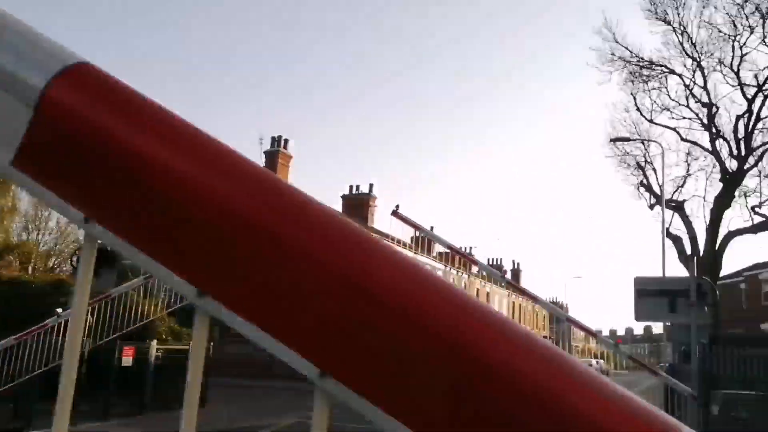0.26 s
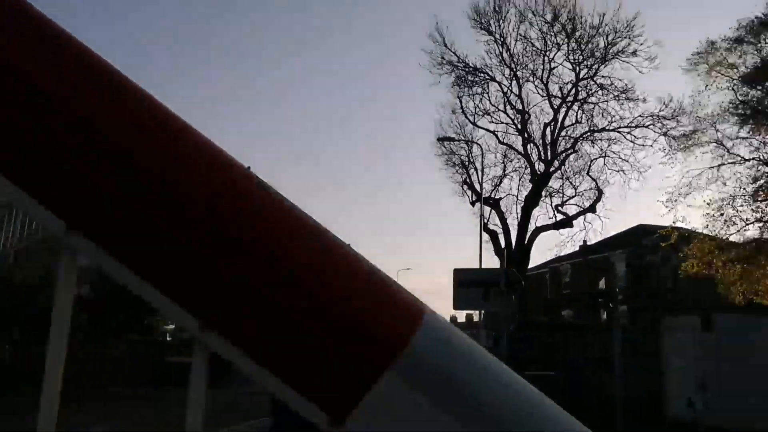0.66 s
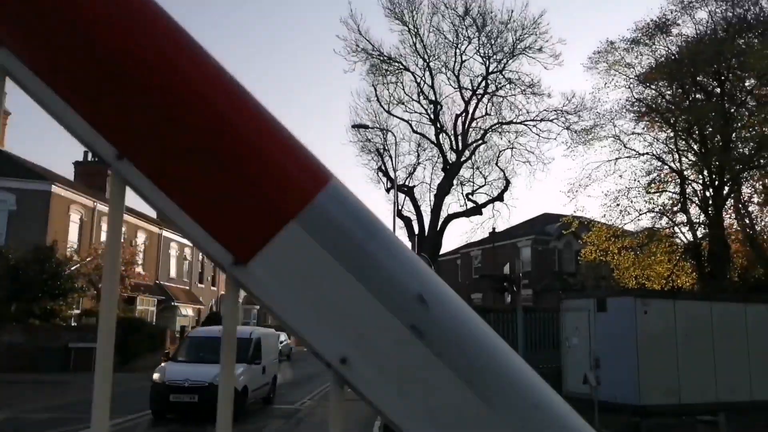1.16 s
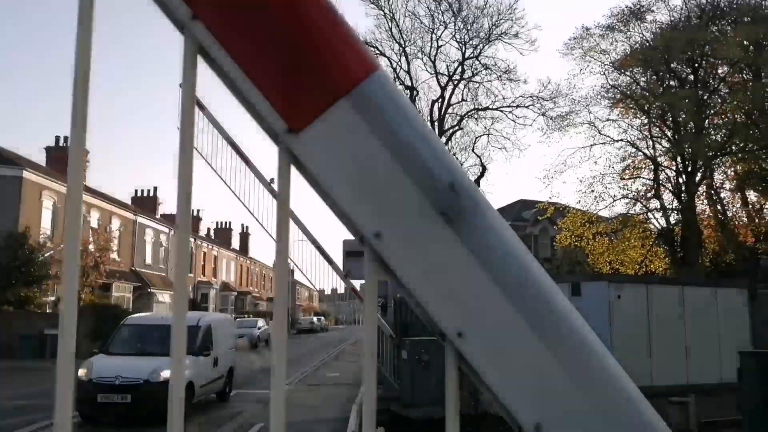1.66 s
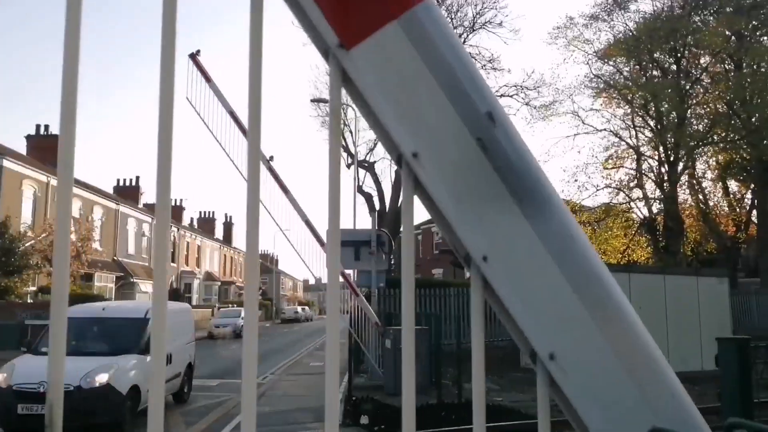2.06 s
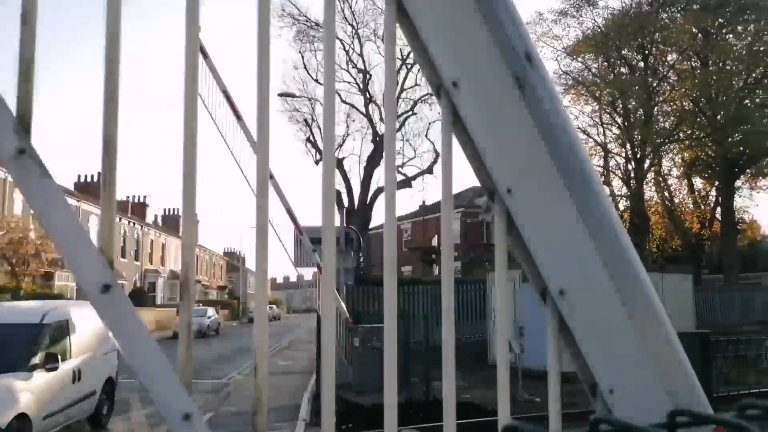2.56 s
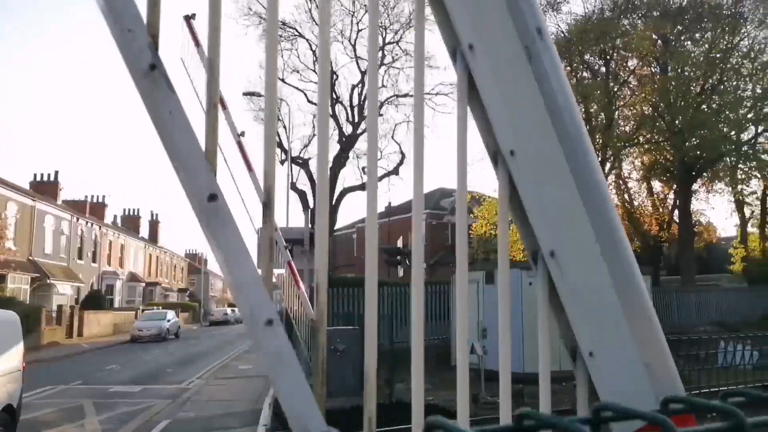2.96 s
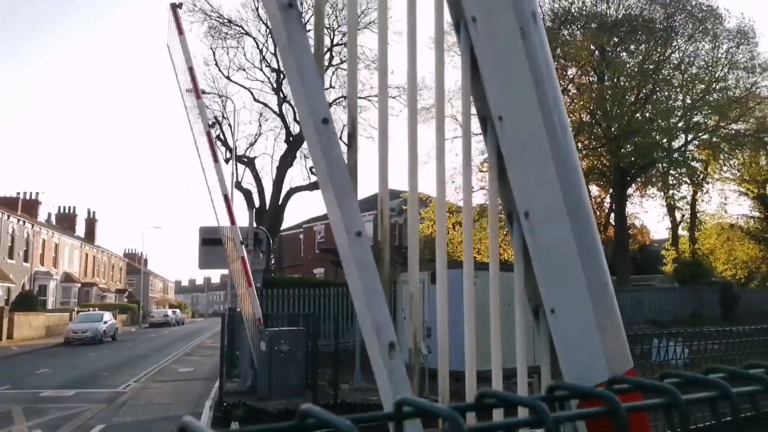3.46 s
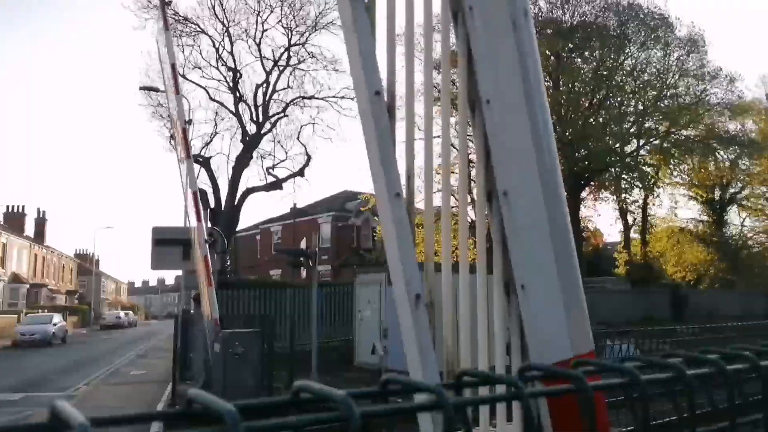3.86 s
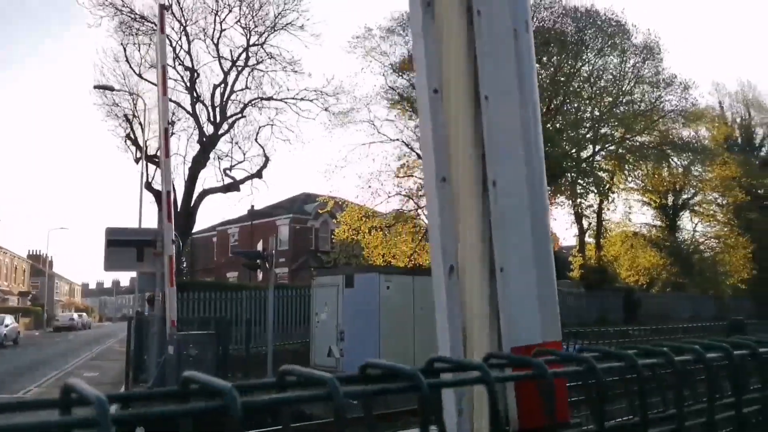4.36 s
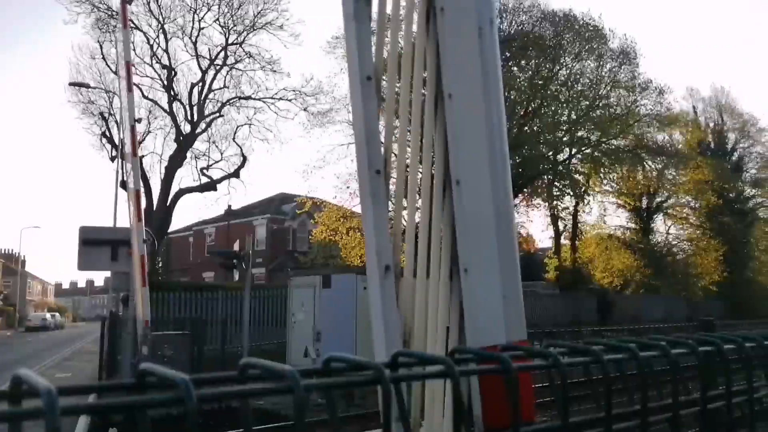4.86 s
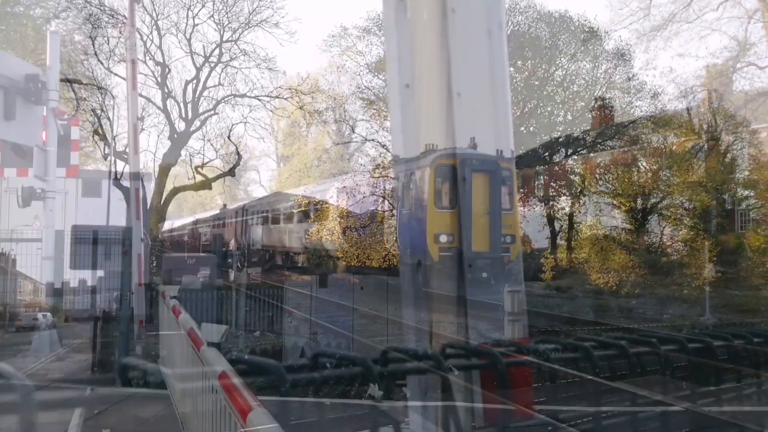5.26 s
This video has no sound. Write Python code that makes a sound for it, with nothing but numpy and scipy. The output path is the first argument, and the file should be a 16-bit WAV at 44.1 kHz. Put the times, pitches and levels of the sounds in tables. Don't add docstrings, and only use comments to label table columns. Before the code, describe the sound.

A steady mid-low hydraulic whine sags slightly as a van pulls past, then wind thumps the microphone and thin metal rods rustle, clatter and tick.

```python
import sys
import numpy as np
from scipy import signal
from scipy.fft import rfft, irfft, next_fast_len
from scipy.io import wavfile

SR = 44100
rng = np.random.default_rng(int(sys.argv[2]) if len(sys.argv) > 2 else 0)


def unload_audio(sound):
    columns = np.transpose(np.atleast_2d(sound))
    steps = np.round(np.clip(columns, -1, 1) * 32767)
    wavfile.write(sys.argv[1], SR, steps.astype(np.int16))


def magnitude_from_level(level_db):
    exponent = np.asarray(level_db, float) / 20
    return 10 ** exponent


N = 242594


def rms_one(x):
    return x / np.sqrt(np.mean(x ** 2) + 1e-20)


def in_time(rows):
    s, *columns = np.transpose(rows)
    t = np.arange(N) / SR
    gate = np.clip(1 + np.minimum(t - s[0], s[-1] - t) / .05, 0, 1)
    return gate, *[np.interp(t, s, c) for c in columns]


def drift(rate_hz):
    r = np.exp(-80 * np.pi * rate_hz / SR)
    steps = rng.standard_normal(N // 40 + 2002)
    slow = signal.lfilter([1], [1, -2 * r, r * r], steps)[2000:]
    return np.interp(np.arange(N) / 40, np.arange(len(slow)), rms_one(slow))


def resonate(x, modes):
    out = 0
    for k, (hz, width_hz, db) in enumerate(modes):
        r = np.exp(-np.pi * width_hz / SR)
        poles = [1, -2 * r * np.cos(2 * np.pi * hz / SR), r * r]
        out = out + (-1) ** k * magnitude_from_level(db) * signal.lfilter([1 - r * r, 0, r * r - 1], poles, x)
    return out


def coloured(spectrum, patchy_db, flicker_hz, grain_db):
    hz, db = np.transpose(spectrum)
    size = next_fast_len(N)
    log_hz = np.log(np.maximum(np.fft.rfftfreq(size, 1 / SR), 1))
    grains = rng.standard_normal(N) * magnitude_from_level(grain_db * drift(150))
    shaped = rfft(grains, size) * magnitude_from_level(np.interp(log_hz, np.log(hz), db, -120, -120))
    centres = np.linspace(np.log(hz[0]), np.log(hz[-1]), num=5)
    spacing = centres[1] - centres[0]
    together = drift(flicker_hz)
    out = 0
    for centre in centres:
        window = np.clip(1 - abs(log_hz - centre) / spacing, 0, 1)
        patch = irfft(shaped * window, size)[:N]
        out = out + patch * magnitude_from_level(patchy_db * (0.59 * together + drift(flicker_hz)))
    return rms_one(out)


def tone(hz, wobble_hz, rough_db):
    level = np.sqrt(2) * magnitude_from_level(rough_db * drift(23))
    return level * np.sin(2 * np.pi * np.cumsum(hz + wobble_hz * drift(9.95)) / SR)


def engine(rows, octave_db):
    gate, hz, db = in_time(rows)
    firing = tone(hz, wobble_hz=.7, rough_db=4.0)
    octave = tone(2 * hz, wobble_hz=3.2, rough_db=6.0)
    return gate * magnitude_from_level(db) * (firing + magnitude_from_level(octave_db) * octave)


def jingle(spectrum, per_s, width_hz):
    hz, db = np.transpose(spectrum)
    strengths = magnitude_from_level(2.7 * np.minimum(rng.exponential(1, N), 4))
    touches = (rng.random(N) < per_s / SR) * strengths
    pitches = np.geomspace(hz[2], hz[-4], num=14) * rng.uniform(.97, 1.03, size=14)
    dealt = rng.integers(0, 14, N)
    out = 0
    for k, pitch in enumerate(pitches):
        mode = (pitch, width_hz, np.interp(pitch, hz, db))
        out = out + resonate(touches * (dealt == k) + 1e-18, [mode])
    return rms_one(out)


# (time [s], level [dB])
TRAFFIC_NEARNESS = [(0.0, -55), (0.64, -53.5), (1.04, -54), (1.33, -42.5), (1.45, -51.5), (1.61, -49),
                    (2.33, -57), (2.74, -55.5), (3.46, -52), (3.58, -46), (4.0, -41.5), (4.3, -37),
                    (4.55, -39), (4.84, -52), (5.33, -52.5), (5.5, -58.5)]
# (frequency [Hz], density [dB per Hz])
TYRE_SPECTRUM = [(210, -11.5), (360, -2), (449, -3.5), (676, -2.5), (735, -6.5), (882, -5), (1540, -16),
                 (1700, -30), (2210, -52.5), (3740, -120)]


def tyre_roar():
    _, db = in_time(TRAFFIC_NEARNESS)
    return magnitude_from_level(db) * coloured(TYRE_SPECTRUM, patchy_db=1.5, flicker_hz=9.0, grain_db=0.0)


# (start [s], end [s], from [Hz], to
# [Hz], level [dB])
FAINT_LINES = [(0, 0.25, 2076, 2100, -65.5), (0.528, 0.918, 782, 761, -59), (0.825, .882, 4640, 4430, -67),
               (1.084, 1.59, 869, 851, -56.5), (1.195, 1.65, 3430, 3430, -66), (1.206, 1.65, 198, 209, -62),
               (2.24, 2.5, 1765, 1750, -65), (2.25, 2.75, 3070, 3050, -67.5), (4.17, 4.28, 965, 946, -50),
               (4.9, 5.533, 572, 592, -58), (5.288, 5.314, 2950, 2800, -51.5), (0, .11, 3130, 3760, -68),
               (2.88, 3.077, 1960, 2110, -63)]


def faint_lines():
    out, t = 0, np.arange(N) / SR
    for start, end, from_hz, to_hz, db in FAINT_LINES:
        fade_s = min(.4 * (end - start), .06)
        swell = np.clip(np.minimum(t - start, end - t) / fade_s, 0, 1)
        hz = np.interp(t, [start, end], [from_hz, to_hz])
        out = out + swell * magnitude_from_level(db) * tone(hz, wobble_hz=.004 * from_hz, rough_db=3.2)
    return out


# (time [s], firing rate [Hz], level [dB])
CAR_FIRING = [(2.7, 40.8, -60), (2.84, 46.67, -43), (3.3, 43.45, -44.5), (3.58, 48.82, -37.5),
              (4.03, 51.45, -35), (4.44, 57.56, -39.5), (4.9, 57.9, -48.5), (5.0, 59, -56),
              (5.5, 60, -59.5)]


def car_engine():
    return engine(CAR_FIRING, octave_db=-12)


# (time [s], firing rate [Hz], level [dB])
VAN_FIRING = [(0.0, 50.4, -60.5), (0.4, 50.33, -54), (0.76, 45.4, -50), (1.16, 58.96, -57.5),
              (1.34, 66.84, -50.5), (1.5, 71.35, -59), (2.06, 77.7, -57), (2.59, 56.4, -55),
              (2.7, 52.8, -72)]


def van_engine():
    return engine(VAN_FIRING, octave_db=-20.5)


# (start [s], full [s], held to [s], gone [s], level [dB])
BODY_BOOMS = [
    (0.99, 1.15, 1.58, 1.78, -41.5),
    (1.56, 1.66, 2.1, 2.16, -50.5),
    (0.93, 1.2, 1.8, 2.93, -55.5),
    (4.76, 4.85, 5.3, 5.35, -55),
]
# (pitch [Hz], width [Hz], level [dB])
BODY_MODES = [
    [(680.6, 20.2, -1), (644, 40.2, -1.5), (583, 190, -6)],
    [(887, 14, 7.5), (860, 21, 2)],
    [(1760, 70, -5), (1723, 76, -5.5), (3425, 61, -11.5)],
    [(1097, 97, -4), (1013, 101, -1.5)],
]


def body_booms():
    _, firing_hz, _ = in_time(VAN_FIRING)
    pulse = 1 + 1.4 * np.sin(2 * np.pi * np.cumsum(firing_hz) / SR)
    knock = rng.standard_normal(N) * pulse
    swing_db = 16
    out = 0
    for (start, full, held, gone, top_db), modes in zip(BODY_BOOMS, BODY_MODES):
        gate, db = in_time([(start, -swing_db), (full, 0), (held, 0), (gone, -swing_db)])
        beats = 0
        for hz, width_hz, mode_db in modes[:2]:
            beats = beats + magnitude_from_level(mode_db) * tone(hz, 0.1976 * width_hz, rough_db=1.5)
        ringing = resonate(resonate(knock, modes), modes)
        out = out + gate * magnitude_from_level(top_db + db - 4) * (rms_one(beats) + 1.1 * rms_one(ringing))
    return out


# (time [s], pitch [Hz], level [dB])
TURBO_WHISTLE = [(1.42, 2210, -72), (1.5, 2326, -50.5), (1.6, 2346, -58.5), (1.72, 2354, -54.5),
                 (1.92, 2200, -57.5), (2.0, 1805, -65), (2.11, 2034, -59), (2.25, 1894, -59.5),
                 (2.42, 1700, -64)]


def turbo():
    gate, hz, db = in_time(TURBO_WHISTLE)
    return gate * magnitude_from_level(db - 2.5) * tone(hz, wobble_hz=16.0, rough_db=4.0)


# (time [s], level [dB])
GUSTS = [(0.0, -61.5), (0.87, -56.5), (1.2, -59.5), (1.7, -57), (1.8, -51.5), (2.3, -58), (2.65, -55.5),
         (3.1, -48.5), (3.2, -40.5), (3.32, -46), (3.4, -48.5), (3.6, -43), (4.0, -33), (4.19, -40.5),
         (4.43, -36), (4.58, -41.5), (4.95, -52.5), (5.5, -56.5)]
# (frequency [Hz], density [dB per Hz])
BUFFET_SPECTRUM = [(12, -24.5), (25, 1.5), (45, -10), (90, -4.5), (140, -24.5)]
# (frequency [Hz], density [dB per Hz])
FLUTTER_SPECTRUM = [(41, -28.5), (70, -8), (227, -10), (280, -8.5), (333, -8.5), (359, -21.5), (387, -25.5),
                    (420, -35.5), (550, -47), (920, -120)]


def wind():
    _, gust_db = in_time(GUSTS)
    calm_db, buffet_calm_db, buffet_growth = -54, -60, 1.33
    buffet = coloured(BUFFET_SPECTRUM, patchy_db=1.5, flicker_hz=2.7, grain_db=-6.5)
    flutter = coloured(FLUTTER_SPECTRUM, patchy_db=3.0, flicker_hz=26, grain_db=-1.5)
    return magnitude_from_level(buffet_calm_db + buffet_growth * (gust_db - calm_db)) * buffet + magnitude_from_level(gust_db) * flutter


# (time [s], peak [dB],
# width [ms], push + or pull - [sign])
WIND_POPS = [(3.1988, -23, .3, -1), (3.2025, -28, .25, -1), (3.2052, -24, 3, 1), (3.2085, -27, .3, -1),
             (3.210, -18, .3, -1), (3.211, -15.5, .3, -1), (3.249, -27, .15, -1), (3.2575, -17, .24, -1),
             (3.2853, -16.5, .5, 1), (3.2865, -25, 3, 1), (3.323, -28, .15, -1), (3.325, -21, .14, -1),
             (3.2575, -29, .07, -1), (3.2853, -25, .05, 1), (3.2255, -33, .2, -1), (3.235, -34, .2, 1),
             (3.2415, -33, .2, -1), (3.1988, -33, .07, -1), (3.337, -27, 3, -1), (3.342, -24, 1, 1),
             (3.3443, -11.5, .9, 1), (3.888, -21, 2.5, -1), (3.935, -18, 1.5, 1), (4.067, -18, 2.5, 1),
             (4.4005, -12, 3, -1), (4.4075, -18, 4, 1), (4.525, -24, 2, -1), (4.597, -30, 4, -1),
             (4.7453, -23, .05, 1), (4.8195, -24, .05, -1), (4.8978, -22, .05, -1), (4.9272, -27, .07, 1)]


def wind_pops():
    rebounds = []
    for s, db, width_ms, push in WIND_POPS:
        if width_ms > .8:
            rebounds.append((s + 2 * width_ms / 1000, db - 6, width_ms * 2.2, -push))
    out = np.zeros(N)
    for s, db, width_ms, push in [*WIND_POPS, *rebounds]:
        at = round(s * SR) + np.arange(-900, 900)
        late = (at / SR - s) * 2000 / width_ms
        pulse = np.exp(-abs(late * np.where(late > 0, .7, 1)) ** 1.25)
        out[at] += np.sign(push) * magnitude_from_level(db) * pulse
    return out


# (time [s], peak [dB],
# ring [Hz], t60 [s])
GRIP_THUMPS = [(3.203, -26, 90, 0.079), (3.924, -25.5, 225, 0.082), (4.054, -18.5, 272, 0.059),
               (4.41, -25, 92, 0.15), (4.404, -23, 190, 0.072), (4.415, -21.5, 257, 0.04),
               (4.52, -21.5, 178.5, 0.093), (4.593, -24, 72, 0.17), (4.632, -27, 65, 0.12),
               (4.873, -31, 70.5, 0.16), (5.245, -36, 80.5, 0.13), (5.24, -37, 185, 0.17),
               (5.238, -33, 1765, 0.061)]


def grip_thumps():
    out, t = np.zeros(N), np.arange(round(.25 * SR)) / SR
    for s, db, hz, t60 in GRIP_THUMPS:
        at = round(s * SR)
        decay = magnitude_from_level(db - 60 * t / max(t60, .01))
        out[at:at + len(t)] -= decay * np.minimum(t * hz, 1) * np.sin(2 * np.pi * hz * t)
    return out


# (time [s], level [dB], brightness [dB])
ROD_SHAKE = [(0.0, -60, 2.5), (1.04, -59, 2), (1.45, -47.5, -1), (1.94, -49, 4.5), (2.2, -53.5, 5.5),
             (2.45, -60.5, 6), (2.74, -59, 7.5), (3.16, -51, 6.5), (3.28, -49.5, -1), (3.37, -51, 1),
             (3.46, -50.5, 3.5), (3.6, -40.5, 1.5), (3.72, -39.5, -2), (4.0, -39.5, 5.5),
             (4.4, -39.5, -2.5), (4.62, -49.5, 2), (4.84, -51, 7), (4.98, -52, 2), (5.5, -61, 6)]
# (frequency [Hz], density [dB per Hz])
RUSTLE_SPECTRUM = [(820, -12), (1400, -4), (1710, -0.5), (2120, 0), (2400, -3), (2630, -0.5), (3450, -4.5),
                   (3930, -12.5), (4300, -11.5), (5590, -41), (9460, -120)]
# (frequency [Hz], density [dB per Hz])
HISS_SPECTRUM = [(2350, -41.5), (4000, -20.5), (4880, -7), (5360, -5.5), (6290, -9), (7090, 3.5),
                 (7420, 7.5), (7700, -8.5), (7900, -23), (10300, -65.5), (17400, -120)]


def rod_rustle():
    _, rustle_db, bright_db = in_time(ROD_SHAKE)
    rustle = coloured(RUSTLE_SPECTRUM, patchy_db=1.0, flicker_hz=7.5, grain_db=1.0)
    rustle = rustle + 0.28 * jingle(RUSTLE_SPECTRUM, per_s=350, width_hz=92)
    hiss = coloured(HISS_SPECTRUM, patchy_db=1.5, flicker_hz=22, grain_db=1.0)
    hiss = hiss + 0.36 * jingle(HISS_SPECTRUM, per_s=430, width_hz=31)
    return magnitude_from_level(rustle_db) * rustle + magnitude_from_level(rustle_db + bright_db) * hiss


# (start [s], end [s], pitch [Hz], width [Hz], level [dB])
ROD_BUNCHES = [(3.4, 4.36, 7300, 450, -45), (3.9, 4.18, 7000, 400, -49), (3.6, 3.92, 2900, 300, -52.5),
               (3.94, 4.17, 3430, 400, -45), (3.85, 4.5, 2005, 330, -45.5), (3.68, 3.9, 1700, 180, -48.5),
               (1.25, 1.55, 1300, 200, -59), (1.346, 1.5, 4100, 600, -57), (3.7, 4.15, 810, 120, -48.5),
               (1.33, 1.6, 2250, 250, -58.5), (1.11, 1.42, 2120, 190, -58), (1.11, 1.5, 1390, 170, -60.5),
               (1.15, 1.8, 2600, 310, -64), (0.75, 1.21, 284, 40, -52), (3.5, 5, 6900, 290, -51),
               (1.45, 1.66, 1730, 120, -53.5), (3.8, 4.3, 6600, 220, -45), (3.91, 4.19, 5400, 400, -48.5),
               (2.77, 2.96, 3060, 90, -59), (1.58, 2.05, 2970, 440, -56.5), (2.95, 3.2, 5500, 720, -58.5),
               (2.9, 3.15, 2020, 170, -60), (3.53, 3.64, 5660, 600, -49), (4.42, 4.5, 7000, 400, -46.5),
               (0.78, 1.6, 544, 150, -53.5), (4.03, 4.09, 403, 80, -39), (3.5, 3.78, 4440, 700, -54.5),
               (3.5, 3.75, 745, 140, -51), (2.2, 2.9, 1410, 310, -64.5), (1.6, 1.76, 640, 90, -49),
               (3.36, 3.5, 2130, 270, -54.5)]


def rod_chatter():
    out = np.zeros(N)
    for start, end, hz, width_hz, db in ROD_BUNCHES:
        at = np.arange(round(start * SR), round(end * SR))
        grains = (rng.standard_normal(N) * magnitude_from_level(2.1 * drift(60)))[at]
        swell = np.clip(np.minimum(at / SR - start, end - at / SR) / 0.043, 0, 1)
        mode = [(hz, width_hz, 0)]
        out[at] += swell * magnitude_from_level(db) * rms_one(resonate(resonate(grains, mode), mode))
    return out


# (time [s], peak [dB], ring [Hz], t60 [s])
ROD_PINGS = [(1.465, -42, 2250, .04), (1.564, -39, 3240, .03), (1.5756, -34.5, 2472, .03),
             (1.632, -39, 2520, .03), (1.676, -43, 1800, .03), (2.669, -51.5, 3080, 0.091),
             (3.02, -47, 4480, .06), (3.11, -45.5, 3080, 0.091), (3.5513, -35, 2089, .03),
             (3.5773, -30, 2840, 0.028), (3.755, -28, 3080, 0.028), (3.931, -33, 2084, .06),
             (3.9863, -30.5, 3300, 0.045), (4.0597, -26, 2900, 0.032), (4.0777, -28.5, 3080, .03),
             (4.119, -31, 2900, .03), (4.134, -28, 2800, .03), (4.2063, -30, 2300, .03),
             (4.2786, -34, 2100, 0.034), (4.456, -25, 2070, 0.034), (4.492, -26, 1938, 0.034),
             (4.5036, -28.5, 4900, .04), (4.5181, -26.5, 2120, .05), (4.5173, -33, 3410, 0.043),
             (4.5224, -23.5, 2030, 0.051), (4.677, -33.5, 2000, 0.047), (4.927, -30.5, 2270, .03),
             (4.9397, -28, 2210, 0.025), (4.9504, -31, 7160, .04), (4.8196, -30, 5700, 0.0091),
             (3.2105, -34, 2300, 0.012), (4.8974, -27, 5900, 0.012), (4.7482, -35, 7100, .05),
             (4.899, -31, 6700, 0.045)]
# (pitch ratio [1], level [dB])
PING_MODES = [(1, 1.5), (1.13, -8.5), (0.8, -8), (1.26, -9)]


def rod_pings():
    out, t = np.zeros(N), np.arange(round(.1 * SR)) / SR
    for s, db, hz, t60 in ROD_PINGS:
        ring = 0
        for ratio, mode_db in PING_MODES:
            phase = rng.uniform(0, 2 * np.pi)
            ring = ring + magnitude_from_level(mode_db) * np.sin(2 * np.pi * hz * ratio * t + phase)
        at = round(s * SR)
        decay = magnitude_from_level(db - 3.5 - 60 * t / max(t60, .01))
        out[at:at + len(t)] += decay * np.minimum(t * hz / 2, 1) * ring
    return signal.sosfilt(signal.butter(2, 900, "high", fs=SR, output="sos"), out)


# (time [s], peak [dB], weight as body re peak [dB], t60 [s])
ROD_TOUCHES = [(1.465, -36, 5.5, 0.057), (1.5294, -32, 1, 0.03), (1.5746, -28.5, -0.5, 0.039),
               (3.262, -41, 6.5, 0.089), (3.327, -39, 5.5, 0.064), (3.4516, -36, -5, 0.058),
               (3.7544, -34, -20, 0.068), (4.348, -19, -31, 0.11), (4.42, -21.5, -10.5, 0.36),
               (4.443, -29, -1, 0.095), (4.5157, -19, 0.5, 0.089), (4.526, -33, 5, 0.19),
               (4.639, -27, -6, 0.12), (4.675, -23, -8.5, 0.077), (4.7455, -21, -9.5, 0.074),
               (4.779, -27, -17, 0.046), (4.869, -28, -7, 0.12), (4.894, -30, -4, 0.12),
               (4.946, -22, -11, 0.095), (4.978, -29.5, -8, 0.086), (5.144, -29.5, -8.5, 0.58),
               (5.1795, -31.5, -12, 0.25), (5.2378, -25.5, -1.5, 0.069), (5.25, -61, 14, 0.14),
               (5.2644, -66, 16, 0.1)]
# (time [s], peak [dB], body re peak [dB])
ROD_TICKS = [(2.7535, -32, -23), (4.5033, -20, -7), (4.7355, -23, -6), (4.745, -18, -20),
             (4.8188, -19.5, -20), (4.833, -31, -13), (4.881, -26, -21), (4.9, -22, -26),
             (4.927, -18.5, -9), (4.9389, -17.5, -6.5), (4.9625, -28, -7), (4.9944, -35, -14),
             (4.9501, -24.5, -12), (4.6845, -29, -8), (5.138, -33, -12), (5.478, -30, -29)]
# (pitch [Hz], width [Hz], level [dB])
HIGH_MODES = [(4810, 260, -11), (5160, 460, -8), (6020, 1300, -11.5), (7115, 303, 7.5), (7600, 550, -1)]
# (pitch [Hz], width [Hz], level [dB])
MIDDLE_MODES = [(1805, 330, -5.5), (2200, 180, 9), (2620, 220, 4.5), (3270, 360, 6)]
# (pitch [Hz], width [Hz], level [dB])
THUD_MODES = [(368, 120, -9), (518, 96, -5.5), (653, 70, -2), (1020, 720, -14)]


def rod_clatter():
    touches = []
    for s, db, weight_db, t60 in ROD_TOUCHES:
        touches.append((s, db, weight_db, 1.89 * weight_db, t60, 31 * t60))
    for s, db, body_db in ROD_TICKS:
        touches.append((s, db, body_db, -34, 0.024, 0.25))
    sprays, t = np.zeros((3, N)), np.arange(round(.2 * SR)) / SR
    for s, db, body_db, thud_db, t60, rise_ms in touches:
        at = round(s * SR)
        rise = np.minimum(t * 1000 / max(rise_ms, .2), 1)
        shape = (magnitude_from_level(db - 60 * t / max(t60, .01)) * rise)[:N - at]
        shares_db = np.array([[-5.0], [body_db - 8.5], [thud_db - 9.0]])
        sprays[:, at:at + len(shape)] += shape * magnitude_from_level(shares_db)
    grit = rng.choice([-1, 1], N) * magnitude_from_level(1.5 * drift(300))
    rings = []
    for spray, modes in zip(sprays, (HIGH_MODES, MIDDLE_MODES, THUD_MODES)):
        rings.append(resonate(spray * grit + 1e-18, modes) / resonate(grit, modes).std())
    high, middle, thud = rings
    thin = signal.butter(4, 1650, "high", fs=SR, output="sos")
    return signal.sosfilt(thin, high + middle) + thud


# (time [s], level [dB])
PUMP_LEVEL = [(0.0, -36.5), (0.1, -33), (0.5, -33.5), (1.1, -39.5), (1.5, -39), (1.85, -40), (2.12, -37),
              (2.58, -37), (2.63, -39.5), (2.72, -36.5), (3.3, -37), (3.4, -42), (3.69, -31.5), (3.9, -32),
              (4.2, -33.5), (4.38, -34), (4.47, -49.5), (4.53, -54)]
# (time [s], pitch [Hz])
PUMP_PITCH = [(0, 348.8), (.55, 347), (1, 344.8), (2, 340.8), (2.6, 339), (3.3, 337.8), (3.6, 335.6),
              (4.52, 332)]
# (multiple of the pitch [1], level re whine [dB])
CASING_OVERTONES = [(2, -30.5), (3, -47)]
# (offset [Hz], level re whine [dB])
SHAFT_SIDEBANDS = [(-70.5, -25.5), (-31, -19), (37, -46.5)]
# (start [s], end [s], a crest [s], period [s], depth [dB])
FAR_PUMP_BEATS = [
    (0.28, 1.6, 0.435, 0.16, 2.0),
    (3.74, 4.16, 3.91, 0.088, 4),
]


def pump():
    gate, db = in_time(PUMP_LEVEL)
    _, hz = in_time(PUMP_PITCH)
    t = np.arange(N) / SR
    for start, end, crest, period, depth_db in FAR_PUMP_BEATS:
        swell = np.clip(np.minimum(t - start, end - t) * 10, 0, 1)
        db = db + depth_db * swell * np.cos(2 * np.pi * (t - crest) / period)
    out = tone(hz, wobble_hz=.45, rough_db=.8)
    for multiple, down_db in CASING_OVERTONES:
        out = out + magnitude_from_level(down_db) * tone(hz * multiple, wobble_hz=6.1, rough_db=4.5)
    for offset_hz, down_db in SHAFT_SIDEBANDS:
        load_db = .5 * (hz - 342.5)
        out = out + magnitude_from_level(down_db + load_db) * tone(hz + offset_hz, wobble_hz=4.0, rough_db=3.5)
    return gate * magnitude_from_level(db) * out


def scene():
    traffic = tyre_roar() + faint_lines() + car_engine() + van_engine() + body_booms() + turbo()
    handling = wind() + wind_pops() + grip_thumps()
    rods = rod_rustle() + rod_chatter() + rod_pings() + rod_clatter()
    return (traffic + handling + rods + pump())[None]


# (centre [Hz], width [Hz], level [dB])
HOUSING_DIPS = [(1525, 150, -5), (4900, 400, -1.5), (6690, 360, -3.5)]


def microphone(x):
    for hz, width_hz, db in HOUSING_DIPS:
        x = x - (1 - magnitude_from_level(min(db, 0))) / 2 * resonate(x, [(hz, width_hz, 0)])
    return x


def duck(x):
    threshold_db, ratio, release_db_per_s, attack_s = -15, 1.3, 32, 0.0074
    ramp = release_db_per_s * np.arange(N) / SR
    over = ratio * np.maximum(20 * np.log10(abs(x) + 1e-9) - threshold_db, 0)
    held = np.maximum.accumulate(over + ramp, axis=-1) - ramp
    r = np.exp(-1 / (attack_s * SR))
    return x * magnitude_from_level(-signal.lfilter([1 - r], [1, -r], held))


def roll_off(x):
    return signal.sosfilt(signal.butter(12, 8410, fs=SR, output="sos"), x)


def record(dry):
    rounded = .45 * np.tanh(duck(microphone(dry)) / .45)
    cutoff_hz = 7850
    steep = signal.cheby2(12, 70, cutoff_hz * 1.051, fs=SR, output="sos")
    return roll_off(signal.sosfilt(steep, rounded))


dry = scene()
out = record(dry)
unload_audio(out)
```